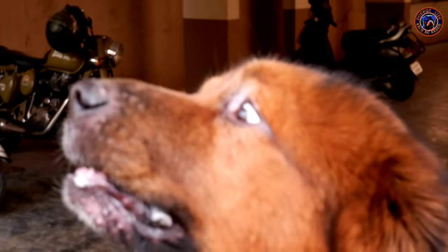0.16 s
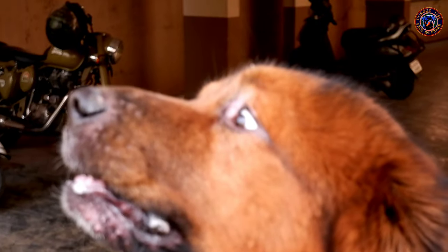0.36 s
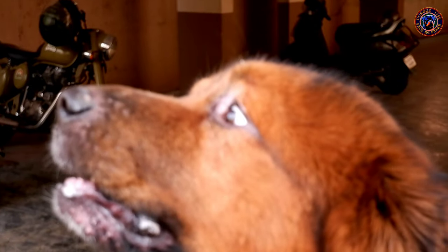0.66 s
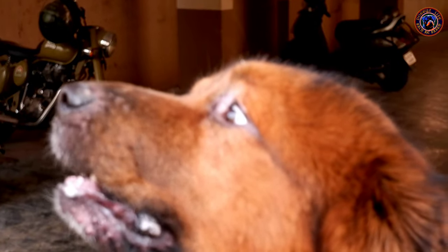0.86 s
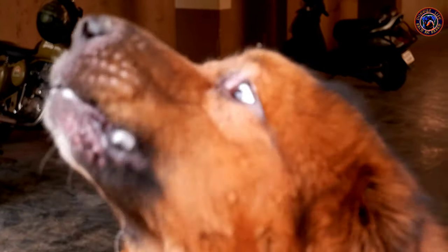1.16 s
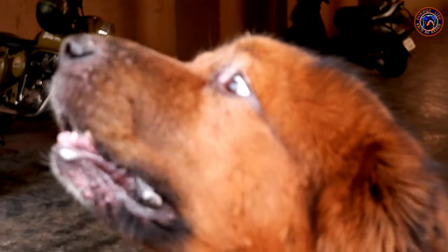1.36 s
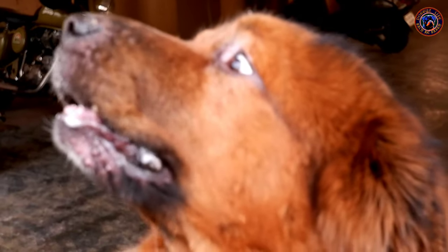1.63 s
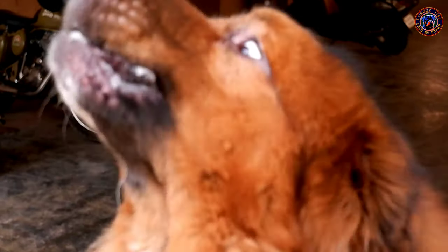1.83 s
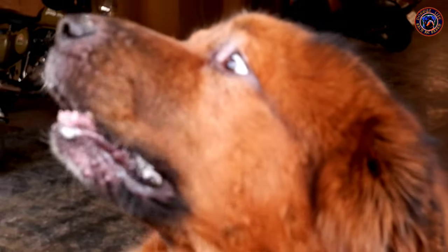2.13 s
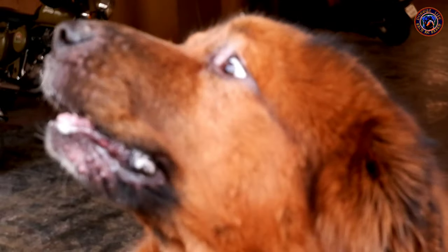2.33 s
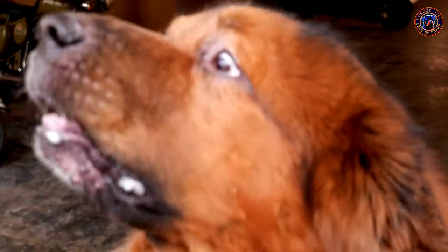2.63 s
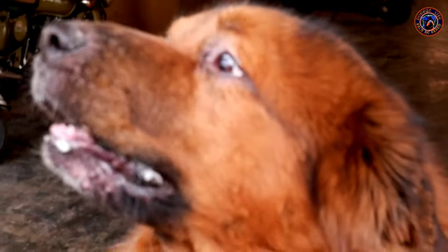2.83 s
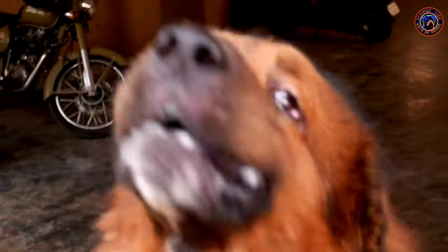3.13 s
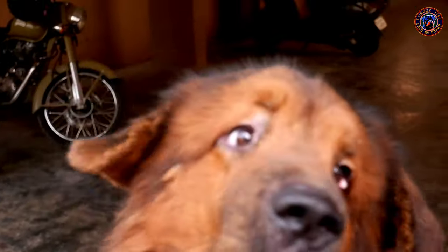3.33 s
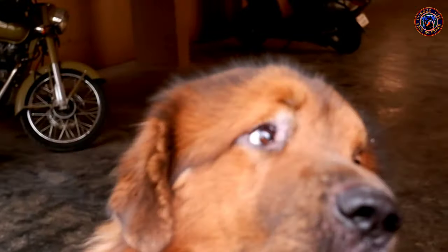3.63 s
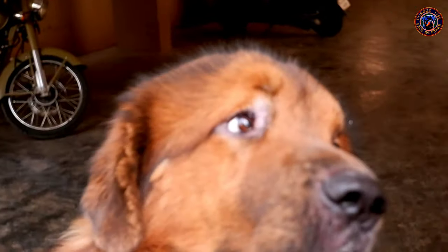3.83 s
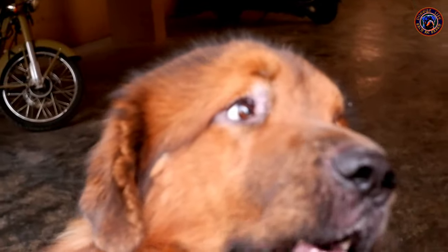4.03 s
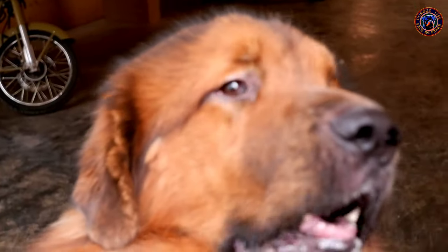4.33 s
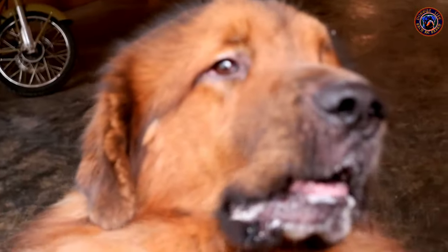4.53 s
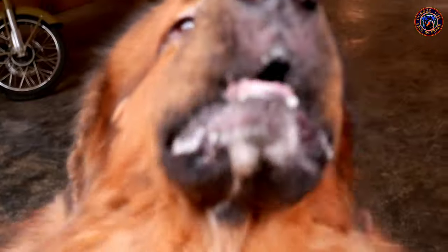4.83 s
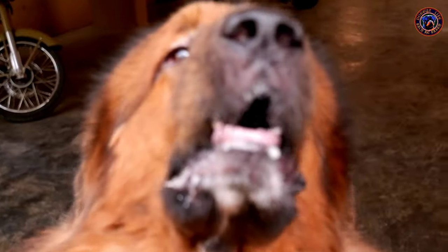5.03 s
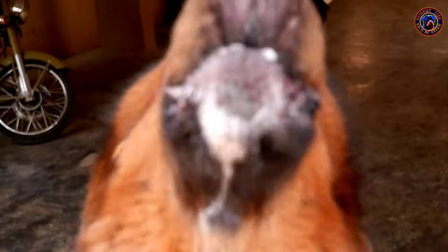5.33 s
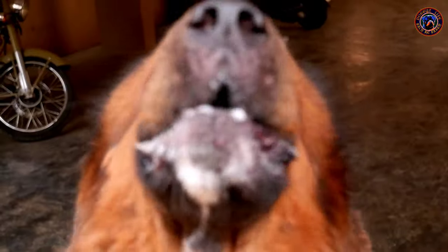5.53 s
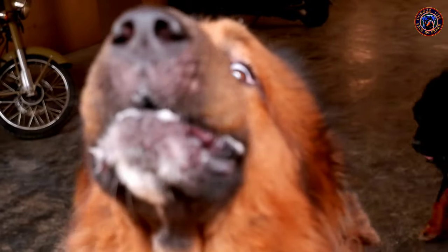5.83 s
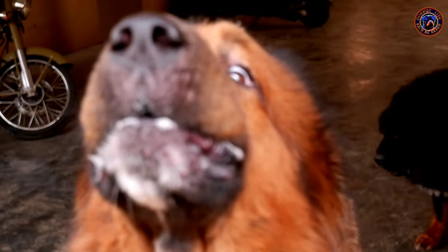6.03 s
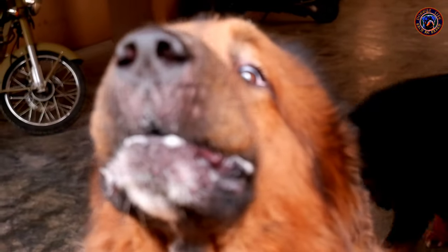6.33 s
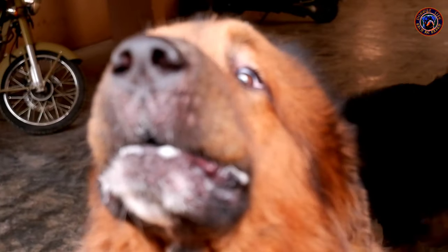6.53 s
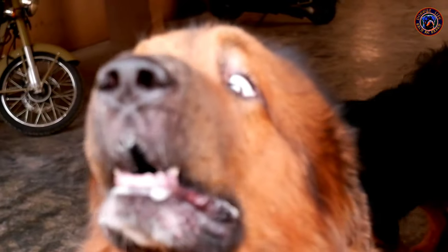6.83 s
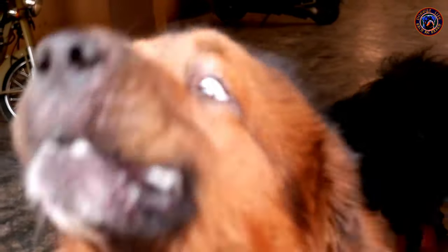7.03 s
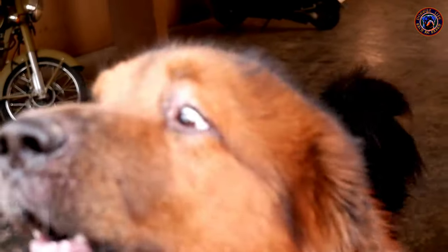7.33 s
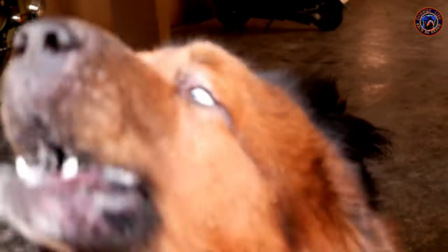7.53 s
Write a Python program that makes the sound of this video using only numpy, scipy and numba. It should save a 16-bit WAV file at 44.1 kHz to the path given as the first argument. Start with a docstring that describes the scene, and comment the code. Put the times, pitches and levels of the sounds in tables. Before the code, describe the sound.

Loud, hoarse barks and high, thin whines from a large dog up close, while a second dog barks from deep in an echoing hall.

```python
"""Two dogs barking in a garage

A big dog barks close to the microphone and a second dog answers from deep in the hard-walled hall.
Each bark is a train of slaps from the vocal folds, shaped by the throat and mouth. Between barks come
thin nose whistles on a hiss of air, a few soft whimpers and a low grumble.
The hall rings for over a second after every bark, above a dull rumble and an airy rush."""
import sys
import numpy as np
from scipy import signal
from scipy.fft import rfft, irfft, next_fast_len
from scipy.io import wavfile
from scipy.ndimage import uniform_filter1d, minimum_filter1d
from numba import njit

SR = 44100
rng = np.random.default_rng(int(sys.argv[2]) if len(sys.argv) > 2 else 0)


def unload_audio(sound):
    """Save the sound as a 16-bit wav file, at the path given as the first command line argument."""
    columns = np.transpose(np.atleast_2d(sound))
    # keep every value between -1 and 1, then stretch to whole-number steps
    steps = np.round(np.clip(columns, -1, 1) * 32767)
    wavfile.write(sys.argv[1], SR, steps.astype(np.int16))


N = 338247
TIME = np.arange(N) / SR


def from_db(db):
    """Turn decibels into a number to multiply by."""
    return 10 ** (np.asarray(db) / 20)


def rms_one(x):
    """Scale a sound so that its average (RMS) level is 1."""
    return x / np.sqrt(np.mean(x ** 2) + 1e-20)


def even(x, window_s=0.014):
    """Hold the level near 1 from moment to moment."""
    return x / np.sqrt(np.abs(uniform_filter1d(x ** 2, max(int(window_s * SR), 8))) + 1e-12)


def at_hz(points, hz):
    """Read a (frequency_hz, value) curve at the given frequencies."""
    points = np.array(points)
    return np.interp(np.log(np.maximum(hz, 1)), np.log(points[:, 0]), points[:, 1])


def in_time(points):
    """Read a (time_s, value) curve at every sample."""
    return np.interp(TIME, *np.transpose(points))


def cut(x, hz, kind, order=2):
    """Keep the "low" or the "high" side of a frequency."""
    return signal.sosfilt(signal.butter(order, hz, kind, fs=SR, output="sos"), x)


def add(track, start_s, sound):
    """Lay a sound into a track."""
    at = max(int(start_s * SR), 0)
    track[..., at:at + sound.shape[-1]] += sound[..., :max(N - at, 0)]


def fade(t, edge_s):
    """A straight fade in and fade out."""
    return np.clip(np.minimum(t - t[0], t[-1] - t) / edge_s, 0, 1)


def drift(t, rate_hz):
    """A random wobble with a size of about 1."""
    knots = rng.standard_normal(int((t[-1] - t[0]) * rate_hz) + 2)
    return np.interp((t - t[0]) * rate_hz, np.arange(len(knots)), knots)


def colour(x, spectrum, size=8192):
    """Filter a sound to follow a (frequency_hz, level_db) curve."""
    gains = from_db(at_hz(spectrum, np.fft.rfftfreq(size, 1 / SR)))
    cepstrum = irfft(np.log(gains))
    # folding onto the first half makes the filter ring only after a sound, never before
    cepstrum[1:size // 2] *= 2
    cepstrum[size // 2 + 1:] = 0
    response = irfft(np.exp(rfft(cepstrum)))[:size // 2]
    return signal.fftconvolve(x, response)[:len(x)]


def stereo_noise(spectrum, size=N):
    """Coloured noise, alike in both channels in the bass and widest near 5 kHz."""
    # how alike left and right are: frequency_hz, likeness (0 to 1)
    likeness = [(100, 1), (1000, 0.99), (2500, 0.89), (5000, 0.22), (9000, 0.4), (14000, 0.96)]
    padded = next_fast_len(size, True)
    hz = np.fft.rfftfreq(padded, 1 / SR)
    mid, side = rfft(rng.standard_normal((2, padded)))
    alike = np.clip(at_hz(likeness, hz), 0, 0.999)
    both = np.sqrt(1 + alike) * mid + np.sqrt(1 - alike) * side * [[1], [-1]]
    return rms_one(irfft(both * from_db(at_hz(spectrum, hz)), padded)[:, :size])


@njit
def ring_filter(x, decay, angle):
    """Each sample feeds on the last two, so the sound rings; angle is in radians per sample."""
    y = np.zeros(len(x))
    for i in range(2, len(x)):
        push = (1 - decay * decay) / 2 * (x[i] - x[i - 2])
        y[i] = push + 2 * decay * np.cos(angle[i]) * y[i - 1] - decay * decay * y[i - 2]
    return y


def resonances(x, modes):
    """Ring at each (centre_hz, width_hz, level_db), filtering twice for steep sides. Centres may move."""
    out = 0
    for hz, width_hz, db in modes:
        decay = np.exp(-np.pi * width_hz / SR)
        angle = 2 * np.pi * hz / SR * np.ones(len(x))
        out = out + from_db(db) * ring_filter(ring_filter(x, decay, angle), decay, angle)
    return out


def vocal_folds(t, hz, rough, jitter=0.13, shimmer_db=7, air=1.0):
    """Uneven slaps plus air let through in each cycle. Gives the sound and its phase."""
    cycles = np.cumsum(hz * np.exp(jitter * rough * drift(t, 350))) / SR
    strength = np.sqrt(SR / hz) * from_db(shimmer_db * rough * drift(t, 400))
    slaps = np.diff(np.floor(cycles), prepend=0) * strength
    phase = 2 * np.pi * cycles
    breath = air * rough * rng.standard_normal(len(t)) * (1 + np.cos(phase)) / np.sqrt(1.5)
    return slaps + breath, phase


def background(rumble_boost_db=5, rush_boost_db=11):
    """The dull rumble of the hall and an airy rush above it."""
    # tone colour of each noise: frequency_hz, level_db
    rumble_colour = [(12, -55), (25, -45), (45, -31), (70, -6), (110, -15), (170, -0.5), (300, -1.5),
                     (500, -10), (900, -28.5), (3000, -32.5), (6000, -69), (14000, -90)]
    rush_colour = [(300, -11.5), (700, -2.5), (1400, -6), (2200, -12), (3500, -28.5), (5000, -27.5),
                   (8000, -42), (11000, -45.5), (14000, -66.5)]
    # how each rises and falls, before its boost: time_s, level_db
    rumble_levels = [(0.0, -39), (0.81, -38.5), (1.43, -56), (1.9, -47.5), (2.03, -53.5), (3.48, -60.5),
                     (4.68, -41), (5.0, -60), (5.77, -59.5), (5.88, -47.5), (6.6, -48), (7.05, -45),
                     (7.24, -57.5), (7.67, -64)]
    rush_levels = [(0.0, -58), (0.25, -52), (1.75, -55), (2.11, -63), (3.16, -62.5), (3.27, -72),
                   (3.57, -67.5), (3.91, -59), (4.72, -48), (4.98, -68.5), (6.32, -66), (7.01, -51.5),
                   (7.22, -76.5), (7.67, -61)]
    rumble = from_db(in_time(rumble_levels) + rumble_boost_db) * stereo_noise(rumble_colour)
    rush = from_db(in_time(rush_levels) + rush_boost_db) * stereo_noise(rush_colour)
    return rumble + rush


def hall(x, delay_s, build_s, treble_db):
    """Dense echoes off hard walls build up, then die away at a different speed in each band."""
    # time the echoes take to fall by 60 dB: frequency_hz, decay_s
    decay_times = [(100, 0.33), (350, 2.12), (700, 1.87), (1300, 1.42), (3000, 0.66), (6000, .7),
                   (14000, .35)]
    # pitches that the hall favours: pitch_hz, width_hz, extra_db
    hall_rings = [(342.4, 22, -2), (417, 13, 0)]
    t = np.arange(2 * SR) / SR
    hz = np.fft.rfftfreq(len(t), 1 / SR)
    echoes = rfft(stereo_noise([(1500, 0.0033), (6000, treble_db)], size=len(t)))
    echoes *= 1 + sum(from_db(db) / (1 + (2 * (hz - f) / width) ** 2) for f, width, db in hall_rings)
    echoes /= np.sqrt(np.mean(np.abs(echoes[:, hz < 1500]) ** 2) / len(t))
    build_up = 1 - np.exp(-np.maximum(t - delay_s, 0) / build_s)
    response = 0
    for band_hz, decay_s in decay_times:
        band = at_hz([(f, f == band_hz) for f, _ in decay_times], hz)
        shape = from_db(-60 * t / decay_s) * build_up
        response = response + irfft(echoes * band) * shape / np.sqrt(np.sum(shape ** 2))
    return signal.fftconvolve(x[None], response, axes=1)[:, :N]


def far_dog(sag=0.33, swell=1.1, tone_db=-13, ring_db=-3, closing_db=4, judder_db=3,
            mouth_hz=662, mouth_width_hz=12):
    """Hoarse barks that swell and sink with their pitch and grow duller as the mouth closes."""
    # barks: start_s, length_s, level_db, top_pitch_hz, roughness (0 to 1), treble_db, mouth_ring_db
    barks = [(.107, 0.16, -13, 410.8, .5, -1.5, -4.5), (0.79, 0.17, -11.5, 440.1, 0.5, -3, -12),
             (3.763, .235, -19, 399.3, .34, -0.5, -11.5)]
    # tone colour of the voice: frequency_hz, level_db
    voice_colour = [(120, -43), (220, -16), (310, -1.5), (430, -10), (550, -1), (670, 3.5), (870, -13.5),
                    (1100, -7), (1450, -25), (1900, -27.5), (2500, -49.5), (3800, -60), (4900, -45.5),
                    (7500, -70.5), (13000, -70.5)]
    # resonances that sing out in the voice: centre_hz, width_hz, level_db
    voice_rings = [(438, 77, -2.5), (1090, 41, -4), (1851, 120, -20.5)]
    out = np.zeros(N)
    for start_s, length_s, db, top_hz, rough, treble_db, mouth_db in barks:
        t = np.arange(0, length_s, 1 / SR)
        effort = np.abs(np.sin(np.pi * t / length_s))
        source, phase = vocal_folds(t, top_hz * (1 - sag * (1 - effort)), rough, shimmer_db=9, air=2.4)
        voice = even(colour(source, voice_colour))
        voice += from_db(ring_db) * even(resonances(source, voice_rings))
        voice += from_db(mouth_db) * even(resonances(source, [(mouth_hz, mouth_width_hz, 0)]))
        brightness = from_db(treble_db + closing_db * (0.5 - t / length_s))
        voice = even(voice + (brightness - 1) * cut(voice, 790, "high", order=1))
        tone = from_db(tone_db) * np.sqrt(2) * np.cos(phase)
        add(out, start_s, (voice + tone) * from_db(db + judder_db * drift(t, 160)) * effort ** swell)
    return out


def grumble(pulse_hz=83, wander=0.094, throb_db=2):
    """Slow, uneven pulses in a closed throat grow louder, then stop."""
    # the one grumble: start_s, length_s, start_db, end_db
    growl = (6, 0.66, -44, -29.5)
    # resonances of the closed throat: centre_hz, width_hz, level_db
    closed_throat = [(147.3, 46, -4.5), (261.3, 61, 0.5), (638, 41, -11.5)]
    start_s, length_s, start_db, end_db = growl
    out = np.zeros(N)
    t = np.arange(0, length_s, 1 / SR)
    source, _ = vocal_folds(t, pulse_hz * np.exp(wander * drift(t, 33)), rough=0.512)
    voice = cut(resonances(source, closed_throat), 1300, "low", order=4)
    level_db = np.linspace(start_db, end_db, len(t)) + throb_db * drift(t, 9.9)
    add(out, start_s, even(voice, window_s=0.13) * from_db(level_db) * fade(t, 0.046))
    return out


def whimpers(octave_db=-13):
    """Short, soft hums with the mouth nearly shut."""
    # hums: start_s, length_s, start_pitch_hz, end_pitch_hz, level_db
    hums = [(2.149, 0.034, 353, 347, -31), (2.754, 0.16, 357, 346, -38), (4.596, 0.13, 348.6, 392, -36.5),
            (7.412, 0.073, 279, 294, -36), (7.52, 0.15, 386, 324, -39)]
    out = np.zeros(N)
    for start_s, length_s, start_hz, end_hz, db in hums:
        t = np.arange(0, length_s, 1 / SR)
        _, phase = vocal_folds(t, np.geomspace(start_hz, end_hz, len(t)), rough=0.12)
        hum = np.sin(phase) + from_db(octave_db) * np.sin(2 * phase)
        add(out, start_s, from_db(db) * np.sqrt(2) * np.sin(np.pi * t / length_s) * hum)
    return out


def nose_air(swell_db=9.5, attack_s=0.04, release_s=0.041):
    """Air blown through the nose hisses: each breath builds up, then dies away."""
    # breaths: start_s, swell_length_s, peak_db
    breaths = [(0.295, 0.15, -41), (0.677, 0.22, -49), (1.092, 0.096, -39.5), (1.459, 0.21, -51),
               (2.402, 0.16, -44.5), (2.72, 0.18, -53.5), (3.052, 0.18, -47.5), (4.045, 0.17, -42),
               (4.312, 0.48, -36.5), (5.668, 0.13, -51.5), (5.85, 0.31, -63.5), (6.625, 0.55, -59.5),
               (7.43, .12, -54.5)]
    # tone colour of the hiss: frequency_hz, level_db
    hiss_colour = [(600, 5), (1200, -16), (2200, -3), (3600, -3), (4500, -3.5), (6000, -10.5),
                   (8000, -15.5), (10500, -12), (12000, -16), (14500, -26.5)]
    flow = np.zeros(N)
    for start_s, length_s, db in breaths:
        t = np.arange(0, length_s + 10 * release_s, 1 / SR)
        shape = np.minimum(t / attack_s, 1) * np.exp(-np.maximum(t - length_s, 0) / release_s)
        add(flow, start_s, shape * from_db(db + swell_db * np.minimum(t / length_s - 1, 0)))
    return flow * stereo_noise(hiss_colour)


def nose_whistles(waver=0.007, flutter_db=3, swell=2.42, airy_swell=1.4):
    """Nearly pure whistles in the nose: each swells and fades along one curved glide in pitch."""
    # whistles: start_s, length_s, start_pitch_hz, end_pitch_hz, mid_bend_hz, level_db
    glides = [(.325, 0.13, 2970, 3257, 23.5, -27), (1.118, 0.061, 3176, 3320, -2, -30),
              (1.152, .07, 3860, 3880, 17.5, -39), (1.208, 0.14, 3910, 3830, -5, -60),
              (1.331, 0.21, 3154, 3130, -130, -40.5), (1.676, 0.075, 3210, 2730, 10, -33.5),
              (2.418, 0.055, 3040, 3274, 0.5, -34), (2.5, 0.052, 3900, 4020, -19.5, -41),
              (2.669, 0.063, 2990, 2890, -45, -38), (2.934, 0.24, 2990, 3190, -300, -35.5),
              (3.26, 0.43, 9450, 9430, -34, -68), (3.578, 0.16, 4120, 4150, -7, -75),
              (4.069, 0.062, 3040, 3234, 0, -31), (4.138, 0.095, 3860, 3880, -12, -41),
              (4.354, 0.038, 3090, 2957, -16, -26), (4.381, .115, 2975, 3280, -20, -39.5),
              (4.476, 0.088, 3240, 3270, 33, -31.5), (4.554, 0.1, 3224, 2960, -21, -24),
              (4.673, 0.15, 2920, 3160, -48.5, -36), (4.923, 0.068, 3000, 2850, 5, -45),
              (5.623, 0.12, 2930, 3205, 24.5, -44), (5.778, 0.25, 3310, 3030, 172, -57),
              (5.988, 0.074, 3060, 2890, -4, -47.5), (6.056, 0.16, 2948, 2884, -20, -37.5),
              (7.398, 0.053, 2370, 2700, 0, -50.5), (7.441, 0.07, 2930, 3170, 7, -35.5),
              (7.508, 0.051, 3160, 3270, 2, -38.5)]
    # the airy edge and weak side tones of every whistle: pitch_ratio, width_hz, level_db
    airy_tones = [(1, 230, -16.5), (.86, 130, -26), (1.2, 130, -31.5)]
    out = np.zeros(N)
    for start_s, length_s, start_hz, end_hz, bend_hz, db in glides:
        t = np.arange(-length_s / 4, length_s * 5 / 4, 1 / SR)   # with a quiet tail at each end
        off_centre = (2 * t / length_s - 1) ** 2
        hz = start_hz + (end_hz - start_hz) * t / length_s + bend_hz * (1 - off_centre)
        phase = 2 * np.pi * np.cumsum(hz * (1 + waver * drift(t, 300))) / SR
        shape = from_db(flutter_db * drift(t, 90)) * np.exp(-swell * off_centre ** 1.41)
        whistle = np.sqrt(2) * shape * np.sin(phase)
        for ratio, width_hz, airy_db in airy_tones:
            air = rms_one(resonances(rng.standard_normal(len(t)), [(hz * ratio, width_hz, 0)]))
            whistle += from_db(airy_db) * air * np.exp(-airy_swell * off_centre)
        add(out, start_s + t[0], from_db(db) * whistle * fade(t, 0.01))
    return out


def lip_puffs(gust_s=0.019, gust_top_hz=130, snap_s=0.006, snap_hz=2500, snap_width_hz=1000):
    """Some barks snap the lips open and push a short gust against the microphone."""
    # puffs of air: time_s, gust_db, snap_db
    puffs = [(1.21, -45, -53), (3.207, -43, -56), (4.8, -32.5, -32), (7.077, -31, -31.5)]
    gust_shape = sum(from_db(db) * np.exp(-((TIME - s) / gust_s) ** 2) for s, db, _ in puffs)
    snap_shape = sum(from_db(db) * np.exp(-((TIME - s) / snap_s) ** 2) for s, _, db in puffs)
    low_noise = cut(rng.standard_normal(N), gust_top_hz, "low")
    thud = even(cut(low_noise, 8.6, "high"), window_s=0.024)
    snap = rms_one(resonances(rng.standard_normal(N), [(snap_hz, snap_width_hz, 0)]))
    return gust_shape * thud + snap_shape * snap


def near_dog():
    """Each bark arches up and down in pitch; as the jaw closes, the mouth's note sinks and rings out."""
    # barks (top_s counts from full_voice_s; "bite" is the treble, "tone" the lowest harmonic):
    # full_voice_s, attack_s, hold_s, top_s, rise_width_s, top_pitch_hz, level_db, bite_db,
    # roughness (0 to 1), tone_offset_db, mouth_ring_db
    barks = [(1.189, .016, 0.061, .064, .125, 377, -6.5, -21, 0.5, 4.5, 1),
             (1.903, 0.021, 0.06, .056, .115, 377.5, -9, -24.5, 0.43, 1, 2),
             (2.566, 0.04, 0.039, 0.04, .11, 368, -8.5, -23, 0.6, 4.5, 1.5),
             (3.192, 0.038, 0.049, 0.027, .085, 386.2, -9.5, -21.5, .62, -10, -7.5),
             (4.792, .022, 0.087, .047, .06, 397, -10.5, -20.5, .52, 3, 6),
             (5.418, 0.021, 0.066, .056, .1, 383.7, -8.5, -18, 0.59, 3.5, 6.5),
             (5.748, .036, 0.05, 0.021, .09, 382, -10.5, -21, 0.81, 2.5, 1.5),
             (7.07, 0.027, 0.086, 0.077, .12, 379.4, -10, -20, .62, 7, 10.5),
             (7.667, 0.029, 0.049, 0.055, .11, 364.7, -9, -12.5, 0.75, 4.5, -19)]
    # upper throat resonances: centre_hz, width_hz, level_db
    throat = [(1211, 149, 11.5), (1401, 86, 0.5), (1730, 62, -4.5), (1976, 61, -3)]
    # tone colour of the thin rasp on top: frequency_hz, level_db
    rasp_colour = [(1500, -1.5), (2400, 1.5), (3200, -3.5), (4200, -18.5), (5300, -4), (6500, -20),
                   (8500, -23), (11000, -24.5), (14500, -36.5)]
    attack_db, droop_db_per_s, release_db_per_s, release_s = 23, 17, 365, 0.077
    bite_lag_s, bite_attack_db, bite_release_db_per_s = 0.011, 30, 377.5
    fall_width_s, slack_roughness = 0.088, 1.3
    jaw_lead_s, jaw_close_s, open_damping_db = 0.02345, 0.0091, 27.5
    open_hz, shut_hz, mouth_width_hz, ring_width_hz = 812, 650.6, 260, 45
    chest_hz, chest_width_hz = 340, 230
    teeth_hz, teeth_width_hz, teeth_db = 5400, 640, -20
    mouth_db, hoarse_db, tone_db, rasp_db, crackle_db = -1, -6, -5, -22, 4
    out = np.zeros(N)
    for at_s, attack_s, hold_s, top_s, rise_s, top_hz, db, bite_db, rough, offset_db, ring_db in barks:
        t = np.arange(-attack_s, hold_s + release_s, 1 / SR)
        # the voice climbs, droops while held, then dies; the treble opens a little later
        released_s = np.maximum(t - hold_s, 0)
        level_db = db + attack_db * np.minimum(t / attack_s, 0)
        level_db -= droop_db_per_s * np.maximum(t, 0) + release_db_per_s * released_s
        treble_db = bite_db + bite_attack_db * np.minimum((t - bite_lag_s) / (attack_s + bite_lag_s), 0)
        treble_db -= bite_release_db_per_s * released_s
        arch = np.exp(-((t - top_s) / np.where(t < top_s, rise_s, fall_width_s)) ** 2)
        harsher = 1 + slack_roughness * (1 - arch) * (t < top_s)   # rougher while the pitch is still low
        source, phase = vocal_folds(t, top_hz * arch, rough * harsher)
        # the jaw closes just ahead of the highest pitch
        opening = 1 / (1 + np.exp((t - top_s + jaw_lead_s) / jaw_close_s))
        mouth_hz = shut_hz + (open_hz - shut_hz) * opening
        body = resonances(source, [(chest_hz, chest_width_hz, 0), (mouth_hz, mouth_width_hz, mouth_db)])
        ring = even(resonances(source, [(mouth_hz, ring_width_hz, 0)]))
        ring *= from_db(ring_db - open_damping_db * opening)
        # loose tissue flaps at about half the rate of the folds and fills the gaps between harmonics
        flaps, _ = vocal_folds(t, top_hz * arch / 2, rough=0.852)
        hoarse = from_db(hoarse_db) * harsher * even(cut(cut(flaps, 420, "high"), 565, "low", order=4))
        tone = from_db(tone_db + offset_db) * np.sqrt(2) * np.cos(phase)
        low_voice = even(even(body) + ring + hoarse + tone) * from_db(level_db)
        bite = even(resonances(source, throat)) * from_db(treble_db)
        voice = cut(low_voice + bite, 2150, "low", order=8)
        # the rasp whistles between the teeth once the jaw has closed
        air = source + rng.standard_normal(len(t))
        teeth = from_db(teeth_db) * (1 - opening) * even(resonances(air, [(teeth_hz, teeth_width_hz, 0)]))
        rasp = even(colour(air, rasp_colour)) + teeth
        rasp *= from_db(treble_db + rasp_db + crackle_db * drift(t, 300))
        add(out, at_s - attack_s, -(voice + rasp) * fade(t, 0.0017))
    return cut(out, 125, "high", order=4)


def scene():
    """Mix both dogs in the hall: the near one has little echo, the far one a lot."""
    # the microphone's two ports differ in tone colour: frequency_hz, left_minus_right_db
    port_balance = [(60, -0.5), (93, -0.5), (150, 0.5), (230, 0.5), (350, 0.0), (550, 0.0), (860, 0.0),
                    (1330, 1.0), (2070, 1.5), (3230, 2.0)]
    whistles = nose_whistles()
    near = near_dog() + whimpers() + grumble()
    far = far_dog()
    into_hall = near + from_db(6.5) * whistles
    near_echo = from_db(-19) * hall(into_hall, delay_s=0.0065, build_s=0.011, treble_db=-2.5)
    far_echo = from_db(0.33) * hall(far, delay_s=0.0011, build_s=0.004, treble_db=1.5)
    stereo_whistles = np.array([whistles, np.roll(whistles, 1)])   # reach the left one sample sooner
    hiss = nose_air() * from_db([[-1.5], [1.5]])   # a little to the right
    mix = near + near_echo + from_db(0.5) * far + far_echo
    mix += stereo_whistles + hiss + lip_puffs() + background()
    left = colour(mix[0], [(hz, db / 2) for hz, db in port_balance])
    right = colour(mix[1], [(hz, -db / 2) for hz, db in port_balance])
    return np.array([left, right])


def record(dry, ceiling=0.84, smooth_samples=441, cutoff_hz=14700):
    """A limiter turns the level down smoothly ahead of the highest peaks, then the top treble is cut."""
    gain = np.minimum(1, ceiling / (np.abs(dry).max(axis=0) + 1e-9))
    gain = minimum_filter1d(gain, 2 * smooth_samples)
    gain = uniform_filter1d(uniform_filter1d(gain, smooth_samples), smooth_samples)
    return signal.sosfilt(signal.ellip(10, 0.1, 80, cutoff_hz, fs=SR, output="sos"), dry * gain)


dry = scene()
out = record(dry)
unload_audio(out)
```